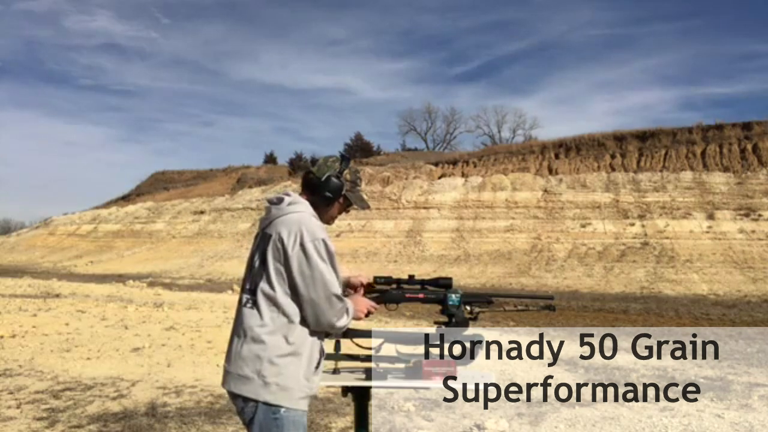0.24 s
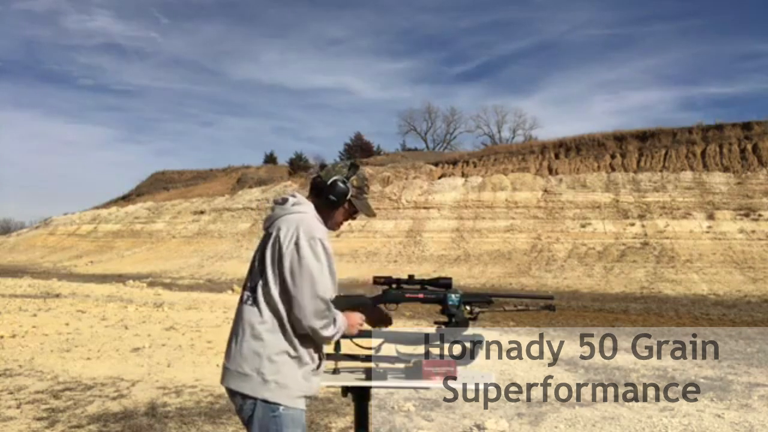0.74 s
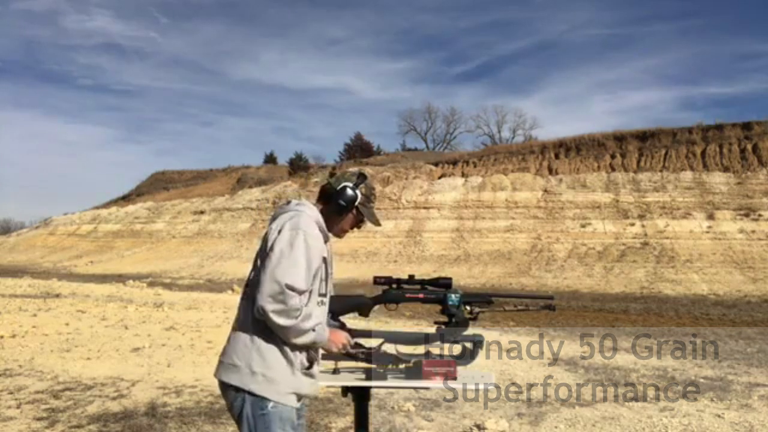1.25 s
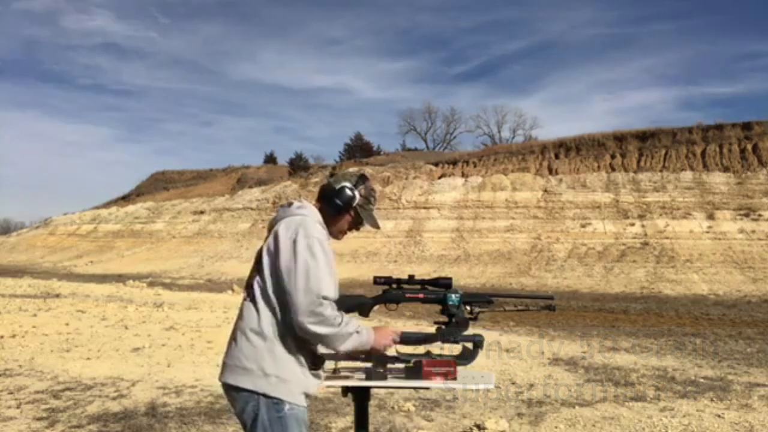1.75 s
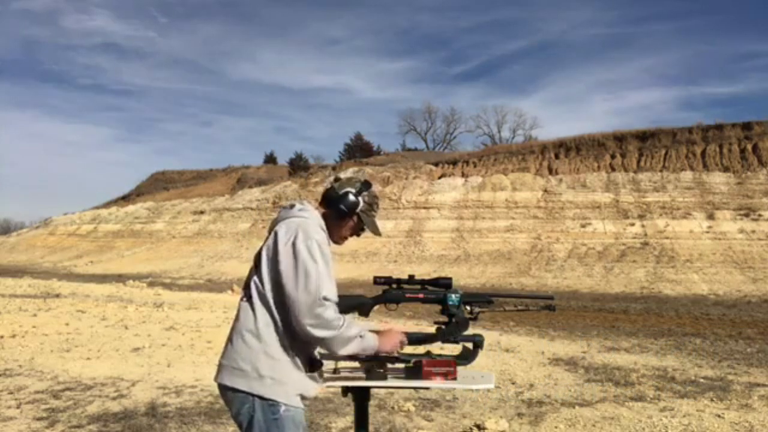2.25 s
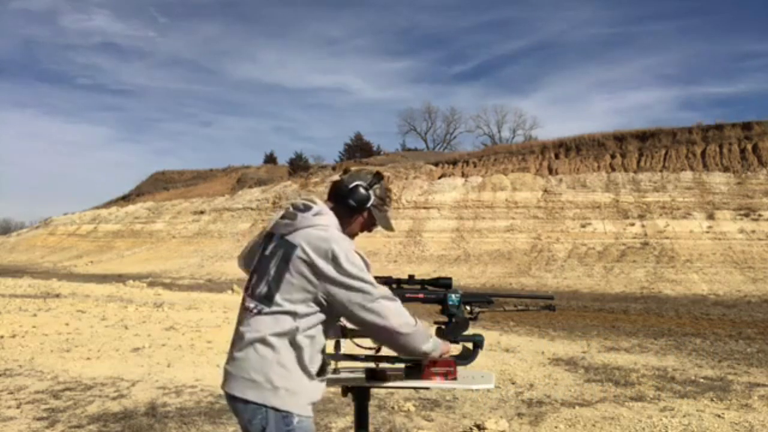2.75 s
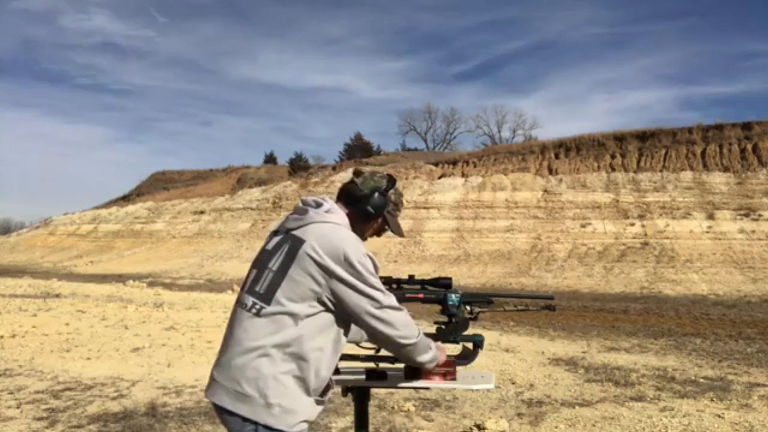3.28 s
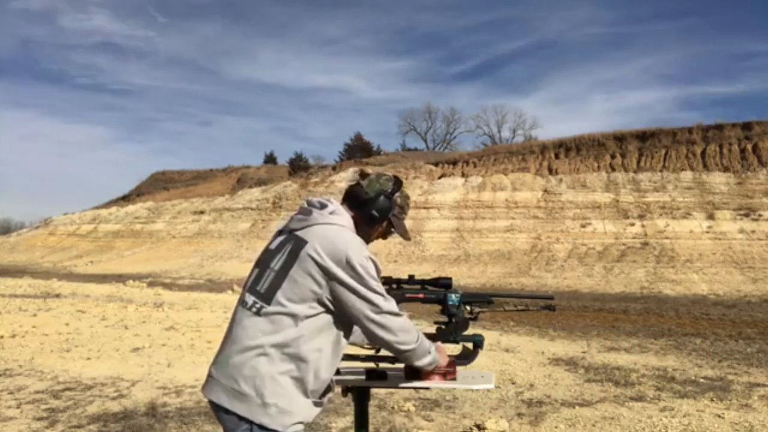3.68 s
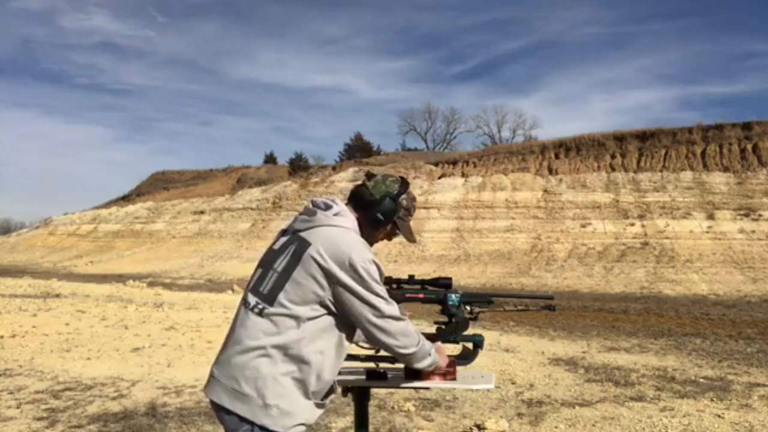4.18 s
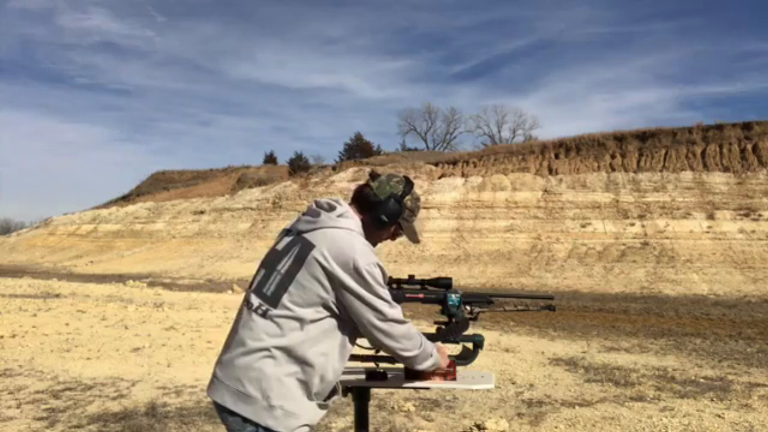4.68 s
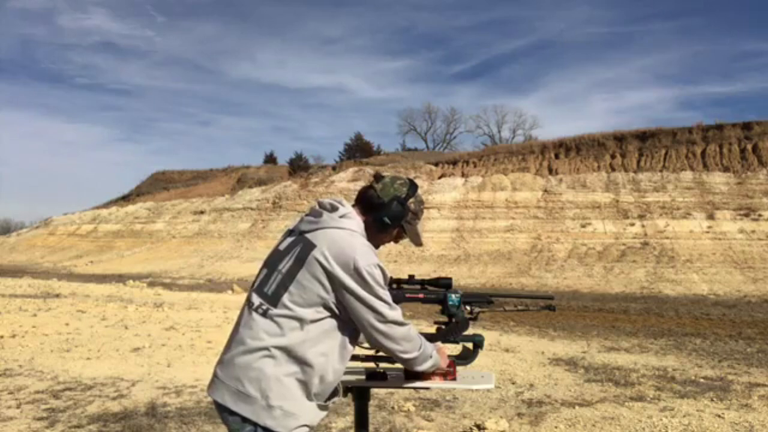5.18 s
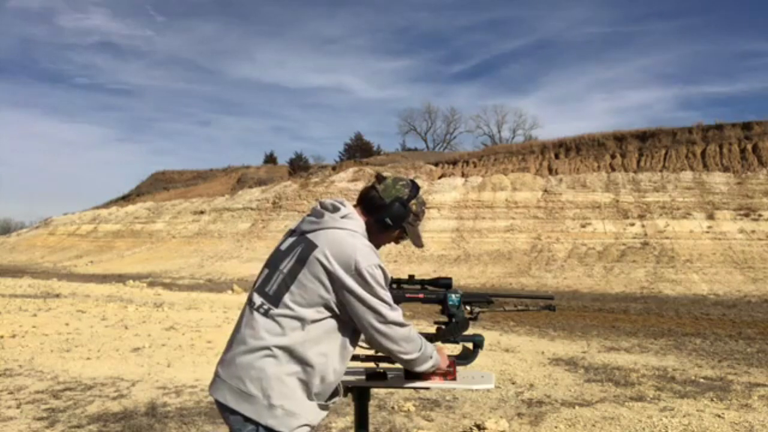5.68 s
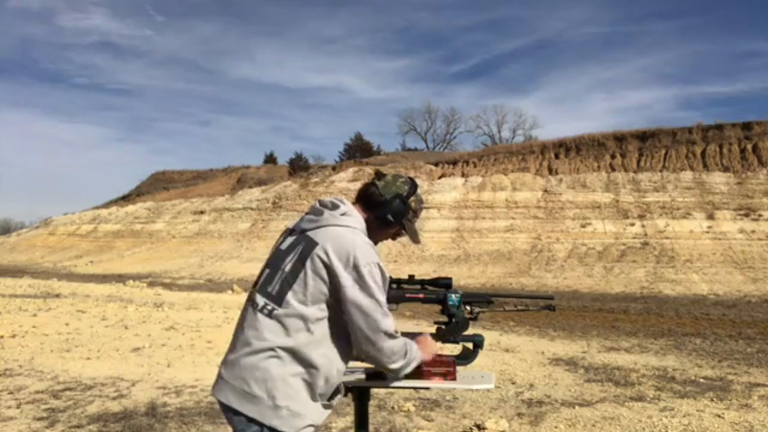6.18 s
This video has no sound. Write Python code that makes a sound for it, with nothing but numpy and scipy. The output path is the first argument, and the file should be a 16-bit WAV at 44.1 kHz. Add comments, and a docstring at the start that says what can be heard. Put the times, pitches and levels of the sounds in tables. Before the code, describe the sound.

Small hard clicks and faint brass pings as rounds are loaded by hand, then quiet picking at a box in a light breeze.

```python
"""Fingers rustle over a breeze and soft hiss, then cartridges are pressed into a magazine and picked from a box.
Fingers are dense random slips ringing damped modes; contacts are gritty pushes into modes plus crack and tail.
Brass cases ping on two high decaying sines; scuffs are narrow-band noise; wind is low noise with buffets.
Two very short, faint whistles with arched pitch come late; a bench knock follows the contacts throughout."""
import sys
import numpy as np
from scipy import signal
from scipy.fft import rfft, irfft
from scipy.io import wavfile
from scipy.ndimage import uniform_filter1d

SR = 44100
rng = np.random.default_rng(int(sys.argv[2]) if len(sys.argv) > 2 else 0)


def unload_wav(signal):
    """Save mono or channel-first audio to the path in sys.argv[1] as 16-bit WAV at rate SR, clipped to [-1, 1]."""
    wavfile.write(
        sys.argv[1],
        SR,
        np.round(np.clip(np.atleast_2d(signal).T, -1, 1) * 32767).astype(np.int16),
    )


N = 283551
TIME = np.arange(N) / SR

# resonances of the magazine: pitch_hz, level_db, t60_s
MAGAZINE_MODES = [(685, -14.5, 0.029), (1039, -7, 0.12), (1340, 8.5, 0.015), (1777, 13.5, 0.0095),
                  (2290, 7.5, 0.02), (2633, -1, 0.028), (3050, 22.5, 0.0044), (3470, -13.5, 0.017),
                  (4136, 6, 0.016), (4830, -16, 0.024), (5774, 14, 0.0097), (6800, -40, 0.024),
                  (10100, -79, .006), (12270, -30, 0.013), (15600, 8, 0.0104)]
# resonances of the plastic box: pitch_hz, level_db, t60_s
BOX_MODES = [(750, -38, 0.0085), (810, -26, 0.059), (1180, 24, 0.012), (1501, 13, 0.023),
             (1970, 5.5, 0.022), (2256, 12.5, 0.014), (2734, 2, 0.01), (3353, 8.5, 0.015),
             (4190, -5.5, 0.016), (4450, -17, 0.036), (5200, -60, 0.0045), (5650, 5, 0.0027),
             (7410, -68, .006), (11900, 4, 0.0077), (14100, 7, 0.012)]
BOX_FROM_S = 2.4  # hands leave the magazine for the box


def undb(db):
    """Decibels to amplitude."""
    return 10 ** (np.asarray(db) / 20)


def unit(x):
    """Scale to rms 1."""
    return x / np.sqrt(np.mean(x ** 2))


def band(x, lo_hz, hi_hz):
    """Butterworth band-pass."""
    return signal.sosfilt(signal.butter(2, (lo_hz, hi_hz), "bandpass", fs=SR, output="sos"), x)


def add(out, start_s, x):
    """Mix x into out from start_s."""
    i = int(start_s * SR)
    out[i:i + len(x)] += x[:N - i]


def decay(t60_s, t):
    """Exponential decays by 60 dB in t60_s, one row each."""
    return np.exp(-np.log(1000) * t / np.asarray(t60_s)[:, None])


def ring(hz, t60_s, t, phase):
    """Decaying sines, one row a mode."""
    return decay(t60_s, t) * np.sin(2 * np.pi * hz[:, None] * t + phase[:, None])


def lumps(samples):
    """Slow random curve of rms 1: noise averaged over a window."""
    return unit(uniform_filter1d(rng.standard_normal(N), size=samples))


def stroke(start_s, length_s):
    """Swell, hold and fade of a rub."""
    swell_s, fade_s = 0.035, 0.06
    edge = np.minimum((TIME - start_s) / swell_s, (start_s + length_s - TIME) / fade_s)
    return np.clip(0.5 + edge, 0, 1) ** 2


def rustle(per_second, spread_db, uneven_db, lumpy_db):
    """Dense tiny slips of uneven size ring magazine, then box; grit hisses above, the palm rubs below."""
    # finger strokes: start_s, length_s, level_db, bright_db and dull_db (both relative to level_db)
    strokes = [(-.03, 0.073, -47.5, -14.5, -34), (0.053, 0.12, -58.5, -15, -29),
               (0.168, 0.24, -57, -7, -12), (0.358, 0.23, -57, -9, -16), (0.631, 0.14, -54, -11.5, -12),
               (0.937, 0.22, -70, -3, -6), (1.361, .14, -57, -20, -18), (1.511, 0.086, -56.5, -17, -18),
               (1.589, 0.2, -62, -12, -3.5), (1.8, 0.27, -67.5, -15, -3), (2.03, 0.22, -66, -19, -16),
               (2.616, 0.5, -76, -7, 3.5), (3.068, 0.06, -69.5, -2, 14.5), (3.129, 0.24, -70, -6.5, 3),
               (3.73, 0.07, -58, -22, -14), (3.873, 0.21, -66.5, -7, -12), (5.048, 0.1, -67.5, -12, -7),
               (5.156, 0.11, -65, -5.5, -17), (5.284, 0.095, -63, -9.5, -3), (5.555, 0.088, -75, -13, 0),
               (5.876, 0.14, -78.5, -13, 7.5)]
    longest_t60_s = 0.035  # under a finger
    occurs, size = rng.random((2, N))
    slips = (occurs < per_second / SR) * undb(-spread_db * np.log(1 - size)) * rng.standard_normal(N)
    # the grip tightens and loosens, quickly and in slower lumps
    slips *= undb(uneven_db * lumps(350) + lumpy_db * lumps(1300))
    held = []
    for modes in (MAGAZINE_MODES, BOX_MODES):
        hz, db, t60_s = np.transpose(modes)
        # skin damps and evens out the modes; being soft, it drives the upper ones weakly
        damped = ring(hz, np.minimum(0.71 * t60_s, longest_t60_s), TIME[:1024], np.zeros(len(hz)))
        drive = undb(0.65 * db) / (1 + (hz / 3000) ** 2)
        body = (damped * drive[:, None]).sum(0)
        held.append(unit(band(signal.fftconvolve(slips, body)[:N], 470, 7000)))
    main, bright, dull = sum(undb([[db], [db + bright_db], [db + dull_db]]) * stroke(start_s, length_s)
                             for start_s, length_s, db, bright_db, dull_db in strokes)
    touched = main * np.where(TIME < BOX_FROM_S, *held)
    grit = bright * unit(band(slips, 4000, 8600))
    palm = dull * unit(band(slips, 267, 823))
    return touched + grit + palm


def wind():
    """Eddies on the microphone: a rumble with bell-shaped buffets and a lighter flutter."""
    # breeze levels, interpolated: time_s, rumble_db, flutter_db
    breeze = [(0.0, -57, -62.5), (0.57, -61.5, -60), (0.95, -68, -66.5), (1.14, -62, -64.5),
              (1.79, -66, -62.5), (2.42, -62, -61.5), (2.88, -61, -63.5), (3.31, -65, -67),
              (3.74, -65.5, -60.5), (4.05, -58, -61.5), (4.33, -57, -55), (4.6, -61, -65), (5.12, -65, -61),
              (5.48, -66, -54), (5.87, -66, -62.5), (6.27, -68.5, -65.5), (6.43, -70.5, -62)]
    # buffets: peak_s, half_length_s (to 1/e), level_db
    buffet_rows = [(0.155, 0.062, -54), (0.898, 0.14, -55), (1.372, 0.036, -50.5), (1.793, 0.056, -50.5),
                   (2.1, 0.27, -70), (2.335, 0.14, -68), (3.11, 0.041, -59), (3.346, 0.038, -58.5),
                   (3.597, .1, -55), (3.758, 0.026, -50.5), (3.872, 0.042, -51.5), (4.01, 0.039, -45),
                   (4.252, 0.075, -45), (4.366, 0.022, -35.5), (4.476, 0.098, -56.5), (4.668, 0.018, -43),
                   (4.84, 0.056, -41), (5.064, 0.027, -65), (5.486, 0.16, -62), (6.176, 0.11, -57),
                   (6.42, 0.044, -56.5)]
    buffet_flutter_db = -33.5  # flutter that comes with a buffet
    time_s, rumble_db, flutter_db = np.transpose(breeze)
    buffets = sum(undb(db) * np.exp(-((TIME - peak_s) / half_s) ** 2) for peak_s, half_s, db in buffet_rows)
    rumble = band(band(rng.standard_normal(N), 28, 200), 24.8, 90.4)
    rumble /= uniform_filter1d(rumble ** 2, size=2600) ** 0.47  # nearly evens out its own level
    flutter = band(rng.standard_normal(N), 104, 283)
    flutter *= undb(2.77 * lumps(3000))  # eddies come in lumps
    rumble_gain = undb(np.interp(TIME, time_s, rumble_db)) + buffets
    flutter_gain = undb(np.interp(TIME, time_s, flutter_db)) + undb(buffet_flutter_db) * buffets
    return rumble_gain * unit(rumble) + flutter_gain * unit(flutter)


def hiss():
    """Steady noise of air and microphone, shaped along log frequency."""
    # noise spectrum: pitch_hz, density_db (relative, per Hz)
    spectrum = [(260, -19), (450, -29.5), (642, -10), (814, -11.5), (1160, -11), (1520, -13.5), (1730, -15),
                (3970, -16), (15500, -24.5)]
    level_db = -70.5
    hz, db = np.transpose(spectrum)
    f = np.arange(N // 2 + 1) * SR / N + 1  # +1 keeps the log finite
    gain = undb(np.interp(np.log(f), np.log(hz), db))
    return undb(level_db) * unit(irfft(rfft(rng.standard_normal(N)) * gain, N))


def brass():
    """A tapped case rings on two thin, high modes."""
    # pings: start_s, lower_mode_db (before onset), upper_mode_db (relative to the lower)
    pings = [(0.0189, -54, -13), (0.392, -54, -2), (0.6644, -51, -1), (0.6994, -68, 14), (0.7444, -57, 4),
             (1.4142, -63, 2), (5.0454, -38.5, -17), (5.1851, -57, -19)]
    # case modes: pitch_hz, t60_s
    case_modes = [(10660, 0.031), (15280, 0.13)]
    out, t = np.zeros(N), TIME[:8192]
    hz, t60_s = np.transpose(case_modes)
    onset = 1 - np.exp(-t / 0.005)
    for start_s, level_db, upper_db in pings:
        lower, upper = ring(hz, t60_s, t, 2 * np.pi * rng.random(2))
        add(out, start_s, undb(level_db) * (lower + undb(upper_db) * upper) * onset)
    return out


def contacts(magazine_crack_db, box_crack_db):
    """A gritty push rings the modes with a dense crack of the same length, then a diffuse tail."""
    # contacts: start_s, peak_db, thud_db, click_db, sheen_db (shares of mode groups), push_ms (to its peak)
    contact_rows = [(0.123, -13, -14, 2, -6, 2.73), (.139, -39.5, -16, -10, -15, 7.7),
                    (.28, -33.5, 12.5, -12, -24, 1), (.377, -42.5, -17, -16, -22, 1.5),
                    (.392, -23, -30, 1, -16, 0.68), (0.4, -31.5, -14, -10, -34, 5),
                    (.417, -31.5, -1, -14, -20, 0.64), (0.432, -31, -6, -8, -26, 0.22),
                    (.444, -16.5, -5.5, -15.5, -36, 0.27), (0.522, -39, -10, -35, -34, 0.96),
                    (0.578, -35.5, -17, -26, -61, 4.2), (0.636, -45, -20, -27, -30, 1.1),
                    (.663, -31, -31, -16.5, -49, 1.2), (0.701, -37, -18, -19.5, -44, 0.72),
                    (1.361, -48, -15, -22, -34, 1.1), (1.414, -32, -17, -21.5, -62, 4.7),
                    (1.453, -44.5, -12, -41, -41, 1.1), (1.463, -51, -4, -29, -35, 1.3),
                    (1.495, -48, -11, -31, -28, 0.96), (1.556, -41, -18, -40, -33, 1.2),
                    (1.633, -47, -20, -14, -15, 1.1), (1.645, -32.5, -21, -30, -42, 1.9),
                    (1.693, -42.5, 5, -29, -31, 0.34), (1.725, -41.5, -9.5, -44, -33, 3.9),
                    (1.962, -45, -14, -33, -26, 0.74), (2.149, -38.5, -15, -23, -21, 1.15),
                    (2.164, -49.5, 4.5, -16, -29, 2.3), (2.533, -56.5, 2, -21, -21, .8),
                    (2.671, -53, 1, -19, -21, 0.54), (2.704, -46, -25, -7.5, -15, 0.3),
                    (2.826, -55, 3, -20, -22, .6), (2.97, -54.5, 9, -22, -24, 0.73),
                    (3.065, -52, -2, -23, -24, 0.35), (3.082, -56, -1, -15, -24, 6.7),
                    (3.095, -50.5, -12, 3, -7, 0.22), (3.144, -56, 7, -25, -25, 0.7),
                    (3.184, -51, 8, -25, -26, 0.87), (3.225, -51, -5, -25, -26, .8),
                    (3.249, -54, -4, -22, -28, .8), (3.31, -50, -7, -20, -26, 1.8),
                    (3.432, -55.5, -23, -12, -23, .4), (3.555, -41, -11, -25, -34, 1.26),
                    (3.567, -42.5, -7.5, -14.5, -30, 0.71), (3.638, -27.5, -1.5, -15.5, -28, 0.13),
                    (3.735, -27.5, -10.5, -22, -34, 0.15), (3.751, -45, -5, -33, -34, 0.54),
                    (3.858, -46, 6, -28, -24, 0.57), (3.9, -38.5, 0.5, -24, -30, 0.66),
                    (3.928, -33.5, -4.5, -26, -33, 0.31), (3.942, -34.5, -8, -23, -30, 0.48),
                    (3.95, -37.5, -13, -18, -28, 0.58), (4.012, -47.5, -11, -17, -32, 1.2),
                    (4.039, -47.5, -6, -34, -32, 0.87), (4.059, -45, -1, -36, -31, 0.21),
                    (4.073, -48.5, 2, -30, -24, 0.29), (4.3157, -9, -2.5, -11.5, -32.5, 0.33),
                    (5.045, -34, -13, -11, -24, 2.4), (5.058, -34.5, -1.5, -17, -38, 0.73),
                    (5.112, -35.5, -28, -18, -40, 1.6), (5.171, -50, -13, -18, -25, 1.1),
                    (5.197, -45.5, -17, -24, -27, 1.8), (5.221, -49, -21, -27, -34, 2.3),
                    (5.24, -57, -20, -10, -26, 0.9), (5.324, -48, -21, -18, -35, 1.3),
                    (5.5156, -32, -2, -8, -44, 1.7), (5.5229, -14.5, -8, -32, -61, 1.34),
                    (5.555, -34, -8.5, -28.5, -40, 0.17), (5.578, -56, -14, -19, -30, 0.71),
                    (5.814, -52, -11, -12, -20, 1.4)]
    # limits of the groups thud, body, click, sheen: edge_hz
    group_edges_hz = (560, 1500, 3900, 8000, 15500)
    # dense unresolved modes, one value a group: t60_s
    crack_t60_s = (0.029, 0.021, 0.027, 0.0033)
    # what bench and ground give back, one value a group: t60_s
    tail_t60_s = (0.074, 0.053, 0.055, 0.064)
    body_db = -9  # share of the modes between thud and click
    scatter_db, detune = 2.5, 0.015  # random spread of each mode's level and relative pitch
    full_scale_tail_db, tail_db_per_db = -16.5, -0.23  # tail share grows as contacts weaken
    out, t = np.zeros(N), TIME[:3000]
    fade, linger = decay(crack_t60_s, t), decay(tail_t60_s, t)
    tail_onset = 1 - np.exp(-t / 0.0079)
    f = np.arange(len(t) + 1) * SR / (2 * len(t)) + 1
    passes = np.array([1 / np.sqrt((1 + (lo / f) ** 6) * (1 + (f / (0.64 * hi)) ** 6))
                       for lo, hi in zip(group_edges_hz, group_edges_hz[1:])])
    for start_s, peak_db, thud_db, click_db, sheen_db, push_ms in contact_rows:
        on_magazine = start_s < BOX_FROM_S
        modes = MAGAZINE_MODES if on_magazine else BOX_MODES
        crack_db = magazine_crack_db if on_magazine else box_crack_db
        tail_db = full_scale_tail_db + tail_db_per_db * peak_db
        hz, db, t60_s = np.transpose(modes)
        group = np.searchsorted(group_edges_hz, hz) - 1
        pitch_chance, level_chance = rng.standard_normal((2, len(hz)))
        grit, noise = rng.standard_normal((2, len(t)))
        rings = ring(hz * (1 + detune * pitch_chance), t60_s, t, np.zeros(len(hz)))
        rings *= undb(db + scatter_db * level_chance)[:, None]
        tau = np.clip(push_ms, 0.03, 12) / 1000
        force = t / tau * np.exp(-t / tau)
        dense = irfft(rfft(noise, 2 * len(t)) * passes)[:, :len(t)]
        hit = 0
        for k, share_db in enumerate((thud_db, body_db, click_db, sheen_db)):
            rung = signal.fftconvolve(force * grit, rings[group == k].sum(0))[:len(t)]
            # a push is never a perfect step
            rung = signal.lfilter(*signal.butter(2, group_edges_hz[k + 1], fs=SR), rung)
            # power enters with the force and leaves at the rate of the dense modes
            power = np.abs(signal.fftconvolve(force ** 2, fade[k] ** 2)[:len(t)])
            crack = dense[k] * np.sqrt(power)
            tail = dense[k, ::-1] * linger[k] * tail_onset
            mix = unit(rung) + undb(crack_db) * unit(crack) + undb(tail_db) * unit(tail)
            hit = hit + undb(share_db) * unit(mix)
        add(out, start_s, undb(peak_db) * hit / np.abs(hit).max())
    return out


def bench_knock(hits):
    """The bench top answers the contacts with a low knock: their 200-412 Hz band."""
    return undb(-11) * band(hits, 200, 412)


def without_bass(hits):
    """Small objects radiate no bass: steep high-pass."""
    return signal.sosfilt(signal.butter(6, 610, "highpass", fs=SR, output="sos"), hits)


def scuffs():
    """Short rubs that sing: noise in one narrow band each."""
    # scuffs: start_s, length_s, centre_hz, width_hz, level_db
    scuff_rows = [(0.956, 0.065, 1280, 350, -66.5), (1.053, 0.06, 4450, 500, -70),
                  (2.145, 0.072, 1550, 300, -63), (3.256, .08, 3720, 300, -72),
                  (5.214, .03, 2300, 300, -59), (5.816, .02, 2310, 200, -64)]
    out = np.zeros(N)
    for start_s, length_s, hz, width_hz, db in scuff_rows:
        noise = band(rng.standard_normal(N), hz - width_hz / 2, hz + width_hz / 2)
        out += undb(db) * stroke(start_s, length_s) * unit(noise)
    return out


def whistles():
    """Faint pure tones whose pitch arches up and down."""
    # whistles: start_s, length_s, top_hz, drop_hz (at the ends), peak_db
    whistle_rows = [(5.436, 0.03, 1396, 40, -69.5), (5.865, 0.071, 1474, 278, -68)]
    out = np.zeros(N)
    for start_s, length_s, top_hz, drop_hz, peak_db in whistle_rows:
        arch = 1 - np.linspace(-1, 1, int(length_s * SR)) ** 2
        phase = 2 * np.pi * np.cumsum(top_hz - drop_hz * (1 - arch)) / SR
        add(out, start_s, undb(peak_db) * arch ** 0.3 * np.sin(phase))
    return out


def scene():
    """All sources summed at a single microphone."""
    hits = contacts(magazine_crack_db=-1.0, box_crack_db=-11.5)
    hits = bench_knock(hits) + without_bass(hits)
    pings = brass()
    fingers = rustle(per_second=3000, spread_db=2, uneven_db=2.2, lumpy_db=2)
    return (hits + pings + fingers + scuffs() + wind() + whistles() + hiss())[None]


def record(dry):
    """The recorder cuts the top: steep elliptic low-pass."""
    top_hz = 15400
    return signal.sosfilt(signal.ellip(10, 0.2, 70, top_hz, fs=SR, output="sos"), dry)


dry = scene()
out = record(dry)
unload_wav(out)
```